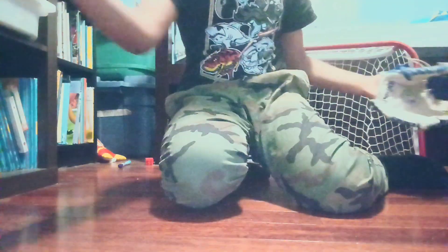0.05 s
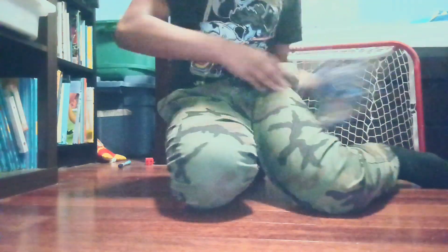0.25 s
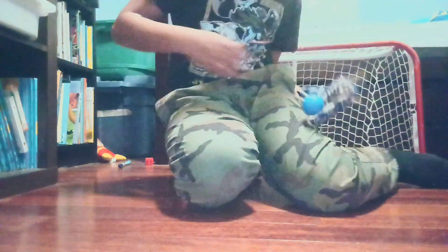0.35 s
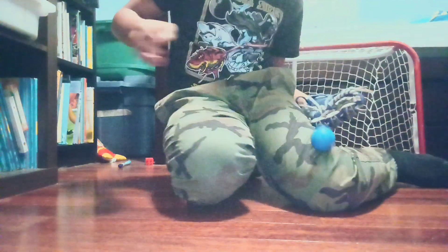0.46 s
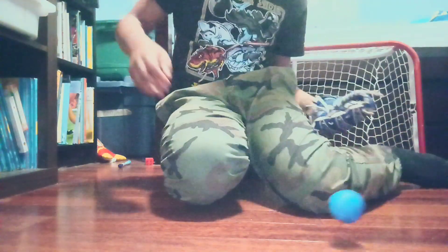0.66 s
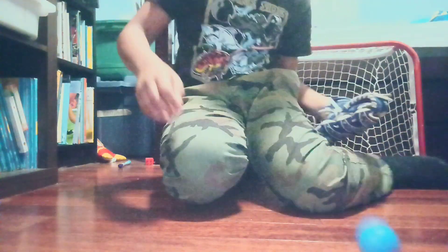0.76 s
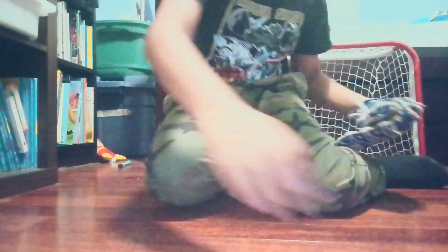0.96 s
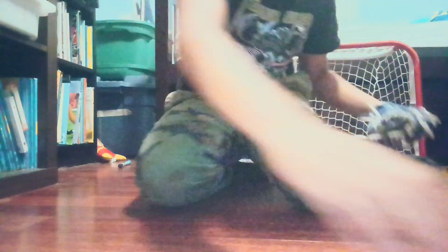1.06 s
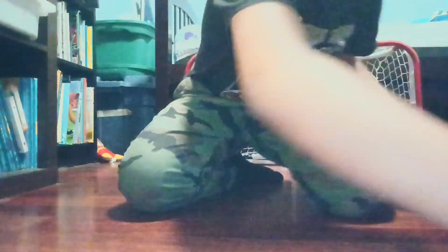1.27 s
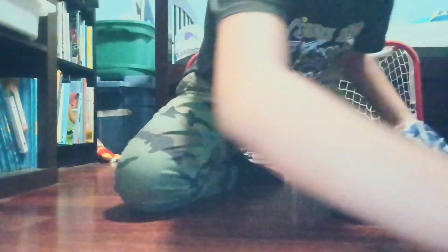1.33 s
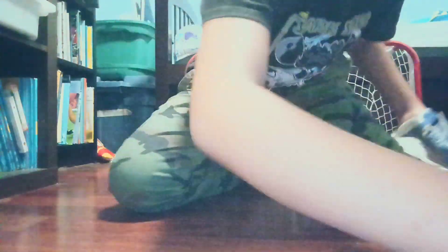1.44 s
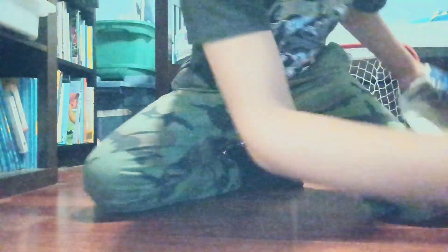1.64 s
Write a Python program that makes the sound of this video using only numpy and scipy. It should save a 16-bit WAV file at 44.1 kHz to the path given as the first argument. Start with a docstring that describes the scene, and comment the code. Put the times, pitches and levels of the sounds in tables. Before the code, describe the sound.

A small ball smacks into a goalie glove, drops onto a wooden floor, bounces ever faster and rolls off. Clothes rustle softly over a faint low hum in a small, slightly echoing room.

```python
"""In a small, live room, a small ball smacks into a goalie glove and drops on the wooden floor.
It bounces ever faster, gives a few last taps and rolls off. Each hit is a gritty tick and a hollow
ring that dies quickly, followed by the room's echo. Clothes rustle and a knee slides as the
kneeling player reaches after the ball, over a low hum and a faint hiss."""
import sys
import numpy as np
from scipy import signal
from scipy.fft import rfft, irfft
from scipy.io import wavfile
from scipy.ndimage import uniform_filter1d

SR = 44100
rng = np.random.default_rng(int(sys.argv[2]) if len(sys.argv) > 2 else 0)


def digitize_waveform(pressure):
    """Quantize a signal to 16-bit integers and store it at the path in sys.argv[1].

    Rows of a 2-D input are taken as channels; values are limited to [-1, 1].
    """
    field = np.atleast_2d(pressure).T
    bounded = np.clip(field, -1, 1)
    quanta = np.round(bounded * 32767).astype(np.int16)
    wavfile.write(sys.argv[1], SR, quanta)


N = 74970
T = np.arange(N) / SR

# The ball's hits; the click depends on the spot struck:
# (time [s], ring level [dB], ring pitch [Hz], tick level [dB], click pitch [Hz], click level [dB])
GLOVE_HITS = [(0.2398, -9.5, 980, -22.5, 3950, -24)]
FLOOR_HITS = [(0.6215, -13.5, 366.6, -25, 3150, -28), (0.7861, -16.5, 340, -26, 3870, -32),
              (0.8838, -17, 342, -30.5, 1910, -30.5), (0.9402, -25, 368, -39.5, 6000, -38),
              (0.9745, -32, 350, -56, 1960, -48), (0.9975, -37.5, 320, -68, 1970, -47),
              (1.0595, -35, 355, -74, 2000, -62), (1.1995, -34, 320, -60, 2020, -53),
              (1.2215, -41.5, 343, -64, 1990, -51)]
# Tones of the ball with glove or boards: (pitch [times the ring pitch], relative level [dB], rise [s])
GLOVE_TONES = [(1, -1, 0.00385), (.78, -10.5, 0.0054), (.58, -24, 0.00364), (.41, -17.5, 0.00437),
               (.26, -16.5, 0.00413), (.16, -21, 0.01965), (1.22, -15, 0.00451), (1.69, -22, 0.00309)]
FLOOR_TONES = [(1, 0.5, 0.0041), (0.5, -10.5, .0036), (0.452, -26, 0.019), (2.18, -11.5, 0.00275),
               (2.65, -17.5, 0.00305), (1.89, -14, 0.0034)]
# First echoes off walls and ceiling: (delay [s], relative level [dB])
GLOVE_WALL_ECHOES = [(0.0158, -26), (0.0304, -9), (0.0406, -12.5)]
FLOOR_WALL_ECHOES = [(0.0278, -18.5), (0.0408, -18), (0.0518, -16.5)]
# How loud the rolling ball and the clothes are: (time [s], level [dB])
ROLL_LEVELS = [(.93, -56), (1.04, -55.5), (1.08, -47.5), (1.17, -46), (1.24, -43), (1.3, -65), (1.4, -62),
               (1.7, -86)]
RUSTLE_LEVELS = [(0, -71.5), (.55, -65), (.75, -58), (.95, -56.5), (1.06, -49), (1.25, -55.5), (1.46, -54),
                 (1.56, -52.5), (1.63, -47), (1.7, -46)]
# Sleeve and knee brushes, and weight shifting on the boards: (start [s], rise [s], fade [s], level [dB])
CLOTH_BRUSHES = [(0, 0.019, 0.051, -54.5), (0.143, 0.029, 0.16, -52), (1.108, 0.031, 0.1, -40.5),
                 (1.259, 0.03, 0.081, -50)]
WEIGHT_SHIFTS = [(.06, 0.029, .03, -45), (1.2, 0.15, 0.073, -45), (1.55, 0.062, 0.024, -46.5)]
# A light, dull tap while reaching: (time [s], pitch [Hz], rise [s], level [dB])
LIGHT_TAPS = [(1.304, 880, 0.0041, -39)]
# How long the room rings: (frequency [Hz], time to fade by 60 dB [s])
ROOM_FADE_TIMES = [(150, 0.06), (350, 0.39), (550, 0.27), (1000, 0.33), (3500, 0.385), (7000, 0.44),
                   (14000, 0.2)]
# The tones of a machine's hum: (pitch [Hz], level [dB])
HUM_TONES = [(49, -53.5), (98.3, -57), (147, -53), (197, -60), (245, -63.5)]
# Each noise's colour, or mix of bass and treble: (frequency [Hz], relative level [dB])
GLOVE_TICK_COLOUR = [(300, -2.5), (1000, 8.5), (1450, 7.5), (2200, 3.5), (2900, 4), (3600, -3.5),
                     (5000, 2.5), (7500, -4), (10300, 0), (13300, -13), (15500, -9)]
FLOOR_TICK_COLOUR = [(300, 3), (1000, 7), (1550, -0.5), (2200, -4.5), (2900, -5), (4500, -2.5), (6300, 2.5),
                     (8300, -6), (10300, 1), (13000, -15), (15500, -6.5)]
ROLLING_COLOUR = [(80, -20), (170, 2), (260, 0), (400, 1.5), (510, -23), (900, -18), (1500, -32),
                  (5000, -53)]
BRUSHING_COLOUR = [(200, -12), (600, -8.5), (950, 4), (1400, -5.5), (2200, 3), (3200, -3), (5000, -6),
                   (8000, -18), (16000, -28)]
CLOTHES_COLOUR = [(150, -16), (450, -5), (900, -7), (1400, -8), (2400, -3), (4500, -2), (6500, -3.5),
                  (8200, -13.5), (10300, -3.5), (13000, -22), (15500, -11.5)]
BOARDS_COLOUR = [(40, -40), (90, -2.5), (150, 8.5), (220, -7.5), (320, -21), (1000, -62)]
ROOM_COLOUR = [(100, 0), (200, -2), (280, -5), (400, -7), (550, 1), (1000, -2), (2500, 9), (6000, 2),
               (10500, 1), (14000, 1)]
HISS_COLOUR = [(25, -25), (70, 3.5), (120, 3), (190, -3), (270, -10.5), (380, -17), (550, -22),
               (870, -13.5), (1400, -22.5), (2400, -24.5), (3800, -32), (6000, -34), (8200, -40),
               (10000, -27.5), (13000, -43), (15500, -31)]


def glove_smack():
    """The ball hits the glove with a crack and a short, hollow ring."""
    direct, to_room = hits(GLOVE_HITS, GLOVE_TONES, GLOVE_TICK_COLOUR, tightness=6.2, tick_s=0.002)
    return in_room(direct, to_room, GLOVE_WALL_ECHOES, tail_db=2.5)


def floor_bounces():
    """The ball and the boards ring together at each bounce."""
    direct, to_room = hits(FLOOR_HITS, FLOOR_TONES, FLOOR_TICK_COLOUR, tightness=3.1, tick_s=0.0018)
    return in_room(direct, to_room, FLOOR_WALL_ECHOES, tail_db=-2.5)


def hits(rows, tones, tick_colour, tightness, tick_s):
    """Each hit is a tick, a ring and a bright click. Gives the direct sound and what the room gets."""
    out = np.zeros((2, N))
    hardest_db = max(row[3] for row in rows)
    dull_above_hz, click_to_room = 4700, 0.26
    for start, ring_db, ring_hz, tick_db, click_hz, click_db in rows:
        ring = sum(undb(db) * ping(ring_hz * ratio, rise, tightness) for ratio, db, rise in tones)
        ring *= -undb(ring_db)
        click = undb(click_db) * ping(click_hz, rise_s=0.000905, tightness=0.79)
        cut_per_octave = 0.26 * (hardest_db - tick_db)  # softer hits have less treble
        dulled = [(hz, db - cut_per_octave * max(np.log2(hz / dull_above_hz), 0))
                  for hz, db in tick_colour]
        direct_tick, room_tick = undb(tick_db) * tick(dulled, tick_s)
        out[0] += late(direct_tick + ring + click, start)
        out[1] += late(room_tick + ring + click_to_room * click, start)
    return out


def tick(colour, fade_s, slap_delay_s=0.0011):
    """The ball's shell touches, slaps flat and scuffs. The room gets a smooth tick of the same colour."""
    scuff = 0.23 * rng.standard_normal(N)
    scuff *= np.exp(0.78 * rng.standard_normal(N) - T / fade_s)  # uneven grit, dying away
    scuff[0] -= 1  # first touch
    scuff[int(slap_delay_s * SR)] += 1
    smooth = 1. * (T == 0)
    pair = np.array([tint(scuff, colour), tint(smooth, colour)])
    pair *= np.sqrt(fade_s * SR / np.sum(pair ** 2, axis=1, keepdims=True))
    pair[0] *= undb(0.5)  # the tick is aimed at the listener
    return pair


def ping(hz, rise_s, tightness):
    """A struck tone that swells and quickly dies; more tightness makes it shorter."""
    loudness = (T / rise_s * np.exp(1 - T / rise_s)) ** tightness
    return loudness * np.cos(2 * np.pi * hz * (T - rise_s))


def rolling_ball():
    """The ball rolls off with a low, bumpy rumble."""
    level_db = np.interp(T, *np.array(ROLL_LEVELS).T, left=-np.inf)
    bumps_db = 4 * wander(per_second=46)
    return undb(level_db + bumps_db) * noise(ROLLING_COLOUR)


def player():
    """Cloth brushes and rustles, the boards rumble under the knees, and something is tapped lightly."""
    brushes = sum(swell(*row) for row in CLOTH_BRUSHES) * noise(BRUSHING_COLOUR, crackle=0.17)
    rustle = undb(np.interp(T, *np.array(RUSTLE_LEVELS).T)) * noise(CLOTHES_COLOUR, crackle=0.17)
    boards = sum(swell(*row) for row in WEIGHT_SHIFTS) * noise(BOARDS_COLOUR)
    taps = sum(undb(db) * late(ping(hz, rise, tightness=3.6), start) for start, hz, rise, db in LIGHT_TAPS)
    flutter_db = 0.3 * wander(per_second=70)
    return (brushes + rustle) * undb(flutter_db) + boards + taps


def in_room(direct, to_room, echoes, tail_db):
    """A sound arrives directly, then off the walls and ceiling, then as a wash of echoes."""
    first_echoes = sum(undb(db) * late(direct, delay) for delay, db in echoes)
    tail = signal.fftconvolve(to_room, room_tail())[:N]
    return direct + first_echoes + undb(tail_db) * tail


def room_tail():
    """Countless echoes blur together; each band of pitches builds up and fades at its own pace."""
    freqs = np.fft.rfftfreq(N, 1 / SR)
    spectrum = rfft(rng.standard_normal(N))
    edges = np.geomspace(60, 18000, 33)
    tail = np.zeros(N)
    for low, high in zip(edges[:-1], edges[1:]):
        hz = np.sqrt(low * high)
        build_s = 0.0012 + 1.8 / hz  # low notes take longer to fill the room
        build = 1 - np.exp(-(T / build_s) ** 2)
        fade = np.exp(-np.log(1000) * T / look_up(ROOM_FADE_TIMES, hz))
        band = irfft(spectrum * (freqs >= low) * (freqs < high), N) * build * fade
        band *= np.sqrt(2 * (high - low) / SR / np.sum(band ** 2))  # energy in step with band width
        tail += band * undb(look_up(ROOM_COLOUR, hz))
    return late(tail, seconds=0.003)


def background():
    """A low machine hum and a faint hiss."""
    hum = sum(undb(db) * np.sqrt(2) * np.sin(2 * np.pi * (hz * T + rng.random())) for hz, db in HUM_TONES)
    return hum + undb(-50.5) * noise(HISS_COLOUR)


def swell(start, rise, fade, db):
    """The loudness of one movement: a smooth rise, then a fade."""
    up = np.sin(np.pi / 2 * np.clip((T - start) / rise, 0, 1)) ** 2
    down = np.exp(-(np.maximum(T - start - rise, 0) / fade) ** 1.65)
    return undb(db) * up * down


def noise(colour, crackle=0):
    """Steady noise of the given colour; crackle makes it grainy."""
    grains = rng.standard_normal(N) * np.exp(crackle * rng.standard_normal(N))
    gains = undb(look_up(colour, np.fft.rfftfreq(N, 1 / SR)))
    return unit(irfft(rfft(grains) * gains, N))


def tint(x, colour):
    """Give a sound a colour without smearing it backwards in time."""
    log_gains = np.log(undb(look_up(colour, np.linspace(0, SR / 2, 4097))))
    folded = irfft(log_gains)
    folded[1:4096] *= 2  # move the early half of the response to the late side
    folded[4097:] = 0
    response = irfft(np.exp(rfft(folded)))
    return signal.fftconvolve(x, response)[:len(x)]


def wander(per_second):
    """A smooth random drift, about 1 in size."""
    width = int(SR / per_second)
    return unit(uniform_filter1d(uniform_filter1d(rng.standard_normal(N), width), width))


def look_up(table, hz):
    """Read between a table's rows, with octaves evenly spaced."""
    freqs, values = np.array(table, float).T
    return np.interp(np.log(np.maximum(hz, 1)), np.log(freqs), values)


def late(x, seconds):
    """Delay a sound."""
    return np.concatenate([np.zeros(int(max(seconds, 0) * SR)), x])[:N]


def undb(db):
    """Turn decibels into a multiplier."""
    return 10 ** (np.asarray(db) / 20)


def unit(x):
    """Scale to an average strength (rms) of 1."""
    return x / np.sqrt(np.mean(x ** 2))


def scene():
    """Ball, player and background together in one channel."""
    return (glove_smack() + floor_bounces() + rolling_ball() + player() + background())[None]


def record(dry):
    """Cut the highest treble, above 16000 Hz."""
    return signal.sosfilt(signal.ellip(8, .2, 70, 16000, fs=SR, output="sos"), dry)


dry = scene()
out = record(dry)
digitize_waveform(out)
```